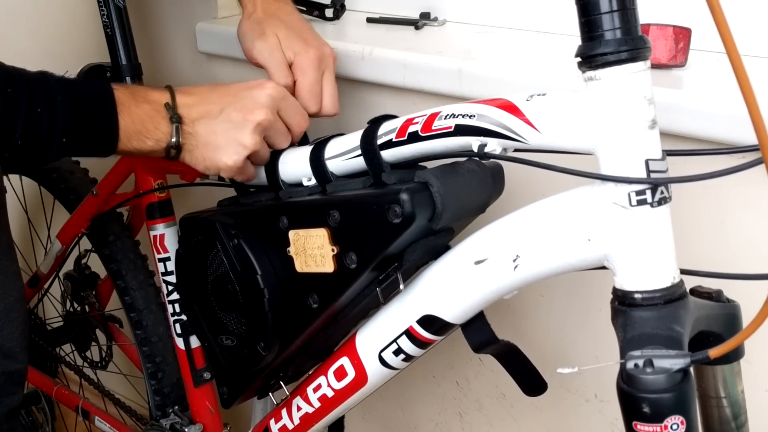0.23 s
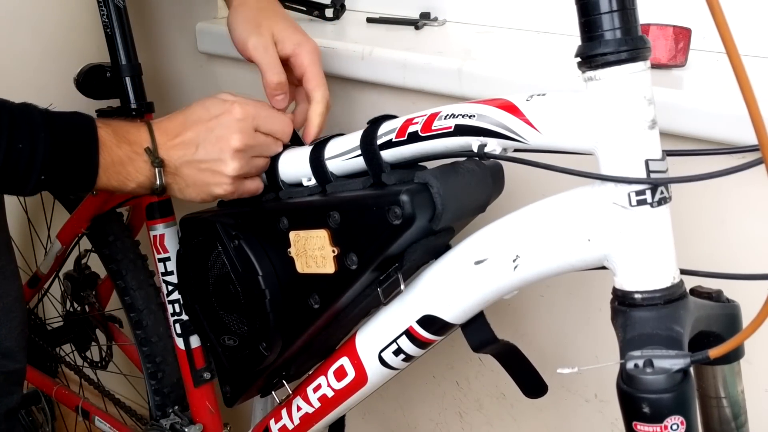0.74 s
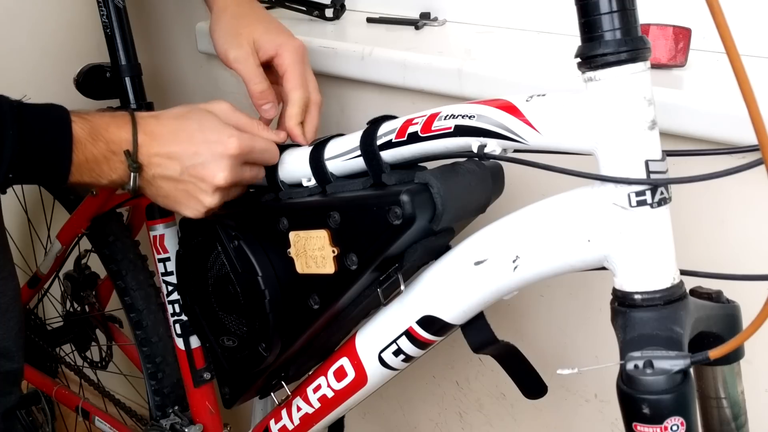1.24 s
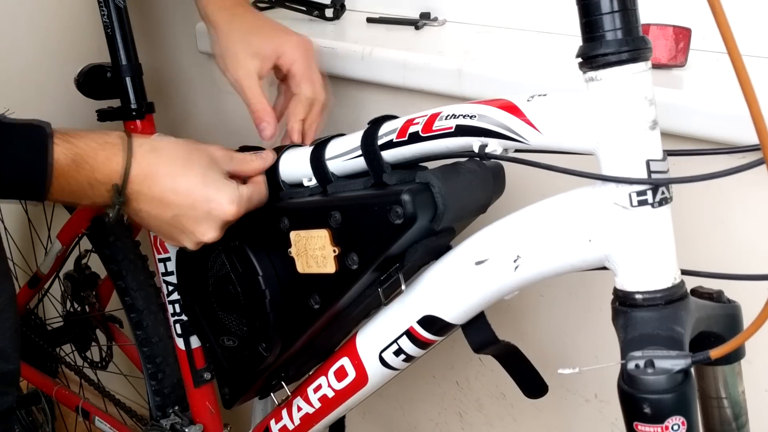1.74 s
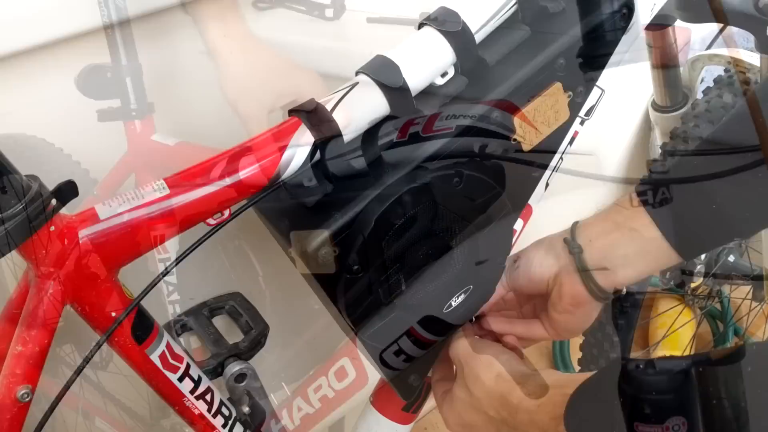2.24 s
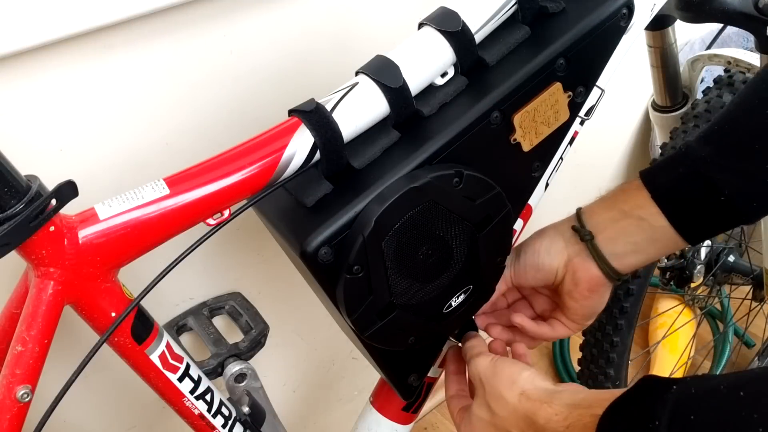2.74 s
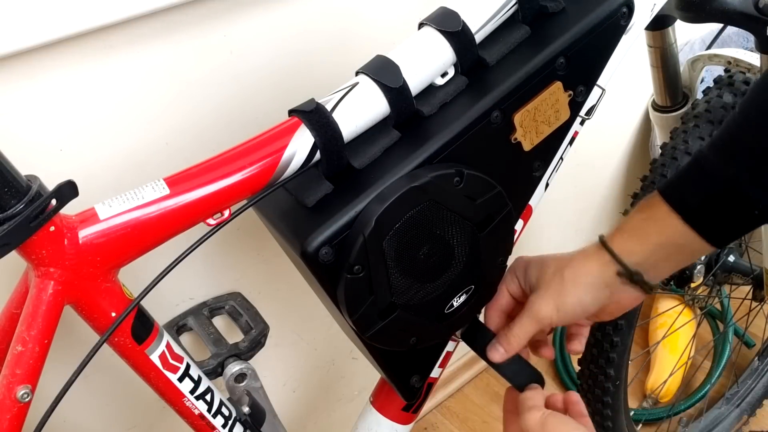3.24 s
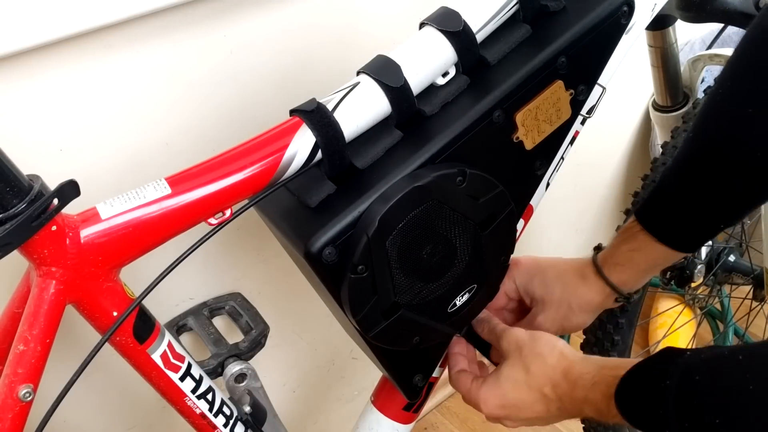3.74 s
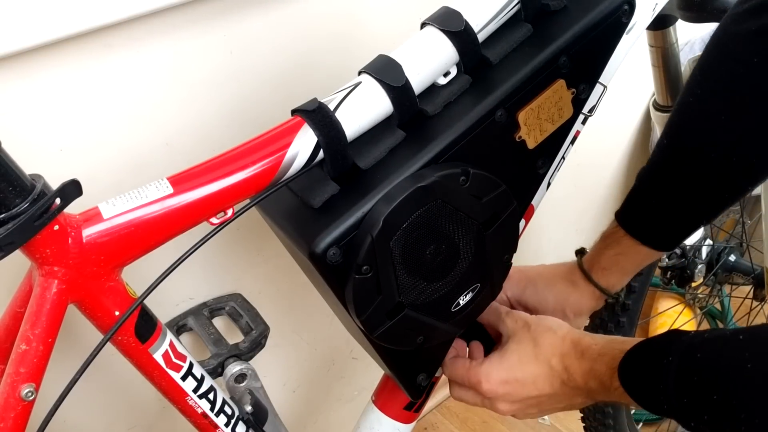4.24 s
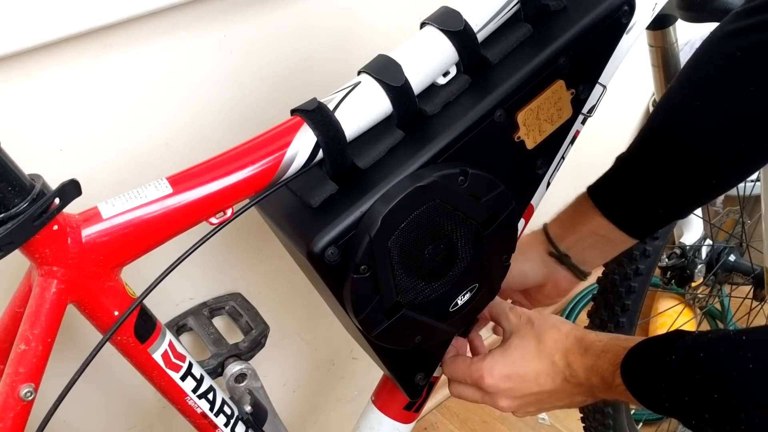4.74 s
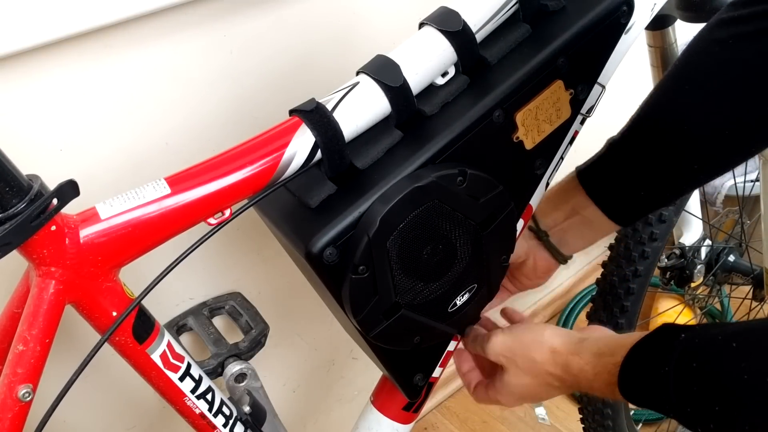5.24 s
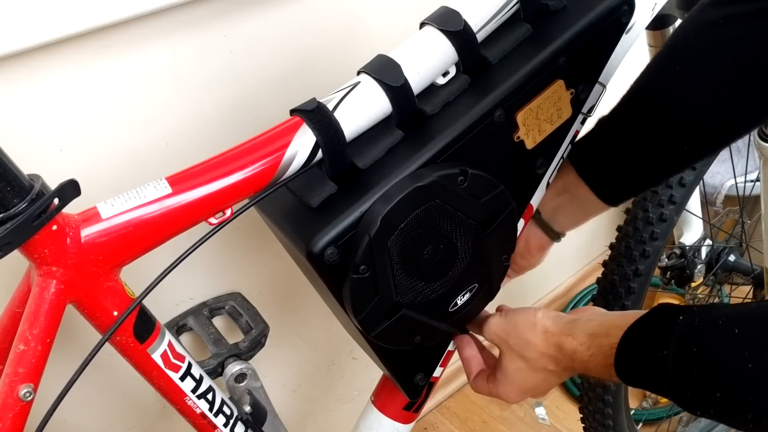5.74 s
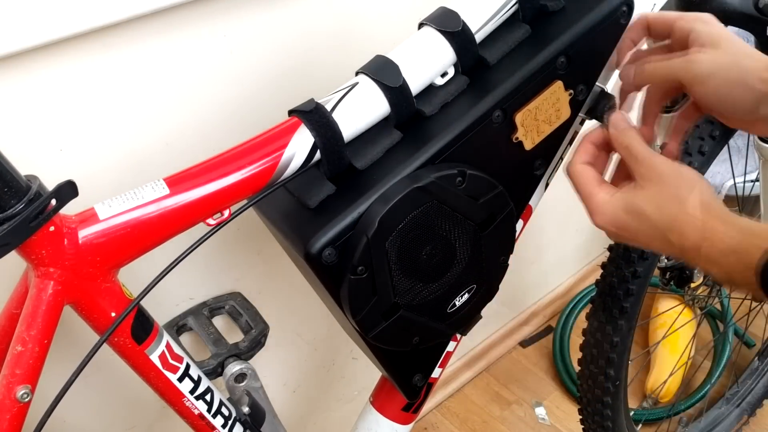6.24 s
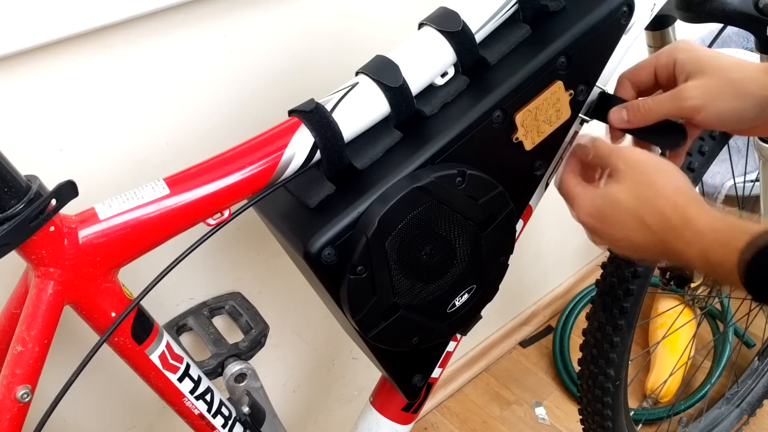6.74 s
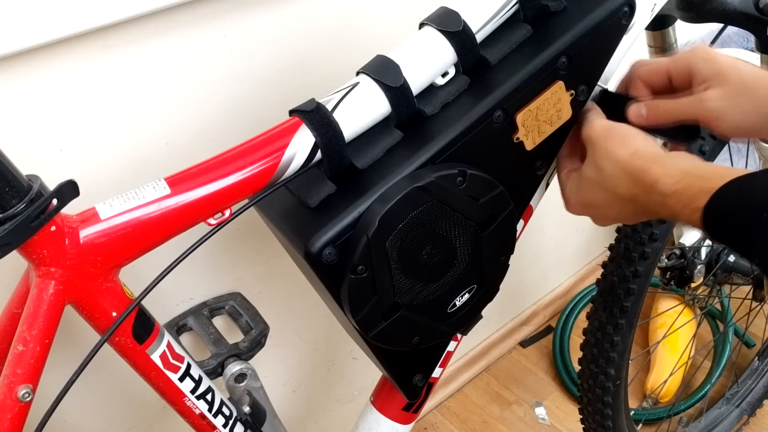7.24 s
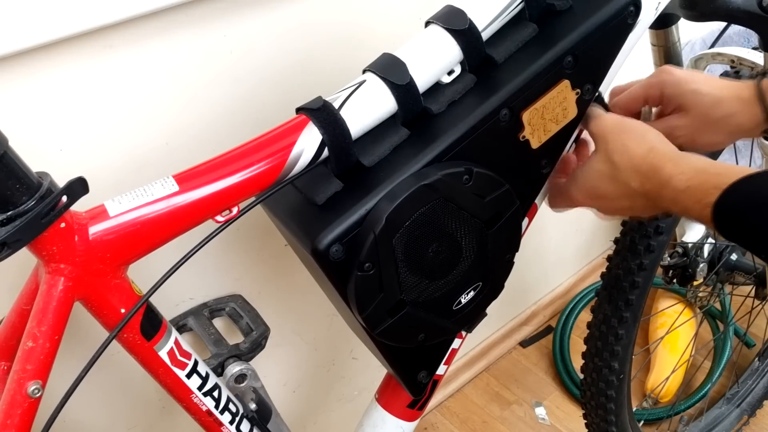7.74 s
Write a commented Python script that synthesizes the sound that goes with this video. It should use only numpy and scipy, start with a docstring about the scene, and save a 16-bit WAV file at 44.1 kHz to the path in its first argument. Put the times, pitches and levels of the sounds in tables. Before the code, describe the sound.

Hook-and-loop straps crackle, snap and rip in short bursts as hands fasten a plastic case to a bicycle frame indoors.

```python
"""Hook-and-loop straps are pulled open and pressed shut around a bicycle frame in a small room.
First the straps rub and crackle lightly, and tiny hooks let go in snaps and short rips. A taut strap
passes their jolts to the plastic case it holds, which rasps and rings. Near 3 s comes a longer peel,
and at 3.7 s the case knocks sharply on the frame. The loudest rips follow between 5 and 5.6 s;
then smaller rips, snaps and soft hand bumps thin out to a last quiet rub."""
import sys
import numpy as np
from scipy import signal
from scipy.fft import rfft, irfft
from scipy.io import wavfile

SR = 44100
rng = np.random.default_rng(int(sys.argv[2]) if len(sys.argv) > 2 else 0)


def persist_wave(psi):
    """Save psi, clipped to +-1, as 16-bit WAV."""
    counts = np.round(np.clip(psi, -1, 1) * 32767).astype(np.int16)
    wavfile.write(sys.argv[1], SR, np.atleast_2d(counts).T)


N = 352359
TOP_HZ = 16000   # upper limit for ringing pitches and for the final sound
PEEL_CLUMPS_PER_S, RIP_CLUMPS_PER_S = 230, 600

# Patches of hooks tearing loose: start_s, length_s, level_db, pitch_hz, tug_vs_hooks_db
RIPS = [(.494, 0.032, -54, 5840, -17), (0.7, 0.0042, -38, 6900, -33), (0.826, 0.013, -52.5, 5800, -30),
        (1.463, 0.037, -53, 9900, -17.5), (2.917, 0.034, -45.5, 8700, -30),
        (3.151, 0.0064, -45, 10100, -13), (3.186, 0.013, -45.5, 10300, -16.5),
        (3.226, 0.0045, -37, 10100, -19.5), (3.394, 0.013, -55.5, 7800, -10),
        (3.524, 0.0071, -51, 8100, 0.5), (3.6998, 0.0072, -38.5, 4070, -14),
        (4.081, 0.029, -56, 6940, -8.5), (4.856, 0.026, -50, 7150, -13), (4.952, 0.021, -51, 7150, -19.5),
        (5.126, 0.023, -41, 9500, -26), (5.3602, 0.0037, -27.5, 8600, -15.5),
        (5.384, 0.041, -41.5, 8570, -10.5), (5.438, 0.023, -39.5, 6260, -13.5),
        (5.5367, 0.02, -32, 7430, -19), (5.804, 0.0072, -47, 4500, -15.5), (6.125, 0.0083, -46, 6850, -12),
        (6.182, 0.013, -44, 5730, -15), (6.253, 0.019, -44, 5360, -14.5), (6.357, 0.021, -43.5, 7040, -20),
        (6.47, 0.014, -43.5, 9200, -13.5), (6.569, 0.0086, -35, 10000, -20),
        (6.746, 0.0072, -50, 4900, -10), (6.894, 0.018, -40.5, 9300, -21), (7.191, .0048, -43, 8200, -14.5),
        (7.5907, 0.0069, -49, 7360, -13)]


def rips(rows=RIPS):
    """Hooks tear loose in a rush. Gives two tracks: their own sound and their tug on the case."""
    hooks, tug = np.zeros(N), np.zeros(N)
    for start_s, length_s, level_db, pitch_hz, tug_vs_hooks_db in rows:
        clicks = avalanche(length_s, level_db)
        add(hooks, start_s, twang(clicks, pitch_hz))
        add(tug, start_s, through_strap(clicks) * from_db(tug_vs_hooks_db))
    return np.array([hooks, tug])


# A few hooks letting go at once: start_s, level_db, pitch_hz
SNAPS = [(.658, -47.5, 6900), (.7678, -40.5, 9560), (.785, -45, 11000), (0.822, -40.5, 10500),
         (.95, -38.5, 11600), (.985, -48, 11500), (1.7438, -51.5, 8450), (1.869, -53, 11000),
         (2.446, -57.5, 6570), (2.581, -51.5, 10300), (2.7566, -45, 9500), (2.9154, -38.5, 11200),
         (2.967, -47, 8400), (3.042, -40, 11500), (3.058, -37, 11400), (3.086, -44, 10860),
         (3.108, -40, 9940), (3.292, -37.5, 7620), (3.451, -49, 8950), (3.8854, -50, 9700),
         (3.9894, -48, 10500), (4.2241, -45.5, 9400), (4.245, -52, 4840), (4.265, -49, 9500),
         (4.287, -47.5, 9200), (4.721, -49, 11100), (4.745, -44, 12400), (5.0355, -49, 11000),
         (5.282, -34.5, 6760), (5.696, -41.5, 7700), (5.762, -40.5, 6000), (5.8847, -48, 5300),
         (6.0274, -41, 6650), (6.154, -41, 10540), (6.3551, -41, 8800), (6.475, -34.5, 9100),
         (6.71, -37, 8450), (6.901, -38, 6500), (7.0317, -42.5, 11000), (7.1745, -44.5, 8500),
         (7.226, -42, 7500), (7.324, -42.5, 11000)]


def snaps(length_s=.0022, tug_vs_hooks_db=-24.5):
    """A snap is a very short rip. Plays the listed snaps and some stray ones."""
    return rips([(start_s, length_s, level_db, pitch_hz, tug_vs_hooks_db)
                 for start_s, level_db, pitch_hz in SNAPS + stray_snaps()])


# Hand movements that peel, thread or smooth a strap:
# start_s, length_s, level_db, pitch_hz, tug_db, crackle (0 = sliding, 1 = peeling)
STROKES = [(.07, 0.052, -65.5, 7800, -83, 0.17), (0.413, 0.12, -69.5, 8000, -85, 0.35),
           (0.648, 0.38, -59, 8000, -78, 0.47), (1.023, 0.093, -53, 7800, -71.5, .3),
           (1.229, 0.31, -72.5, 9500, -105, 1), (1.522, 0.16, -79, 9700, -81.5, .1),
           (1.826, 0.14, -69.5, 7700, -80, .2), (2.052, 0.092, -61.5, 8260, -72, 0.085),
           (2.192, 0.048, -64.5, 5350, -73, 0.6), (2.369, 0.044, -69.5, 8000, -77.5, .2),
           (2.555, 0.096, -69.5, 6400, -83, 0.74), (2.728, 0.085, -66, 8500, -79.5, 0.34),
           (2.92, .21, -54, 9400, -67, 0.78), (3.126, .165, -52, 7700, -65, 0.74),
           (3.324, 0.62, -72, 7860, -82, 0.9), (3.98, 0.35, -75, 6570, -81.5, .4),
           (4.358, 0.19, -62.5, 7600, -77, 0.11), (4.597, 0.058, -56.5, 9300, -72, 0.21),
           (4.728, 0.094, -70.5, 5900, -79.5, .2), (4.87, 0.49, -62, 7230, -80, 0.31),
           (5.134, 0.032, -46.5, 6340, -59.5, .3), (5.229, .11, -60, 6700, -77, 0.56),
           (5.36, 0.14, -45, 6100, -77, 0.47), (5.541, 0.089, -48.5, 5370, -70, 0.29),
           (5.659, 0.12, -57, 6270, -72, .3), (5.8, 0.36, -67, 6860, -76, .3),
           (5.938, 0.049, -57.5, 7200, -77, 0.16), (6.121, .22, -63.5, 5800, -69.5, 0.35),
           (6.38, 0.055, -50.5, 7860, -65.5, 0.24), (6.472, .23, -65, 6200, -67.5, 0.11),
           (6.979, 0.11, -56.5, 9200, -74.5, 0.96), (7.167, 0.08, -56, 8400, -66.5, 0.62),
           (7.289, 0.12, -57, 7140, -68, 0.57), (7.438, 0.28, -66, 7900, -72, 0.2),
           (7.719, 0.24, -74, 7260, -75, 0.16)]


def strokes(fade_in_s=.028, fade_out_s=.04, surge_db=5):
    """A strap rubs as it slides and crackles as it peels. Gives the hook sound and the tug."""
    hooks, tug = np.zeros(N), np.zeros(N)
    t = np.arange(SR) / SR
    for start_s, length_s, level_db, pitch_hz, tug_db, crackle in STROKES:
        pull = np.clip(t / fade_in_s, 0, 1) * np.clip(1 - (t - length_s) / fade_out_s, 0, 1)
        pull *= from_db(surge_db * crackle * surges(t))
        grains = pull * rng.standard_normal(len(t))
        grains *= clumps(len(t), PEEL_CLUMPS_PER_S, steady_share=1 - crackle)
        add(hooks, start_s, twang(grains, pitch_hz) * from_db(level_db))
        add(tug, start_s, through_strap(grains) * from_db(tug_db))
    return np.array([hooks, tug])


def stray_snaps(peeling_per_s=20, boost_db=5, spread_db=4, tries=24):
    """The more a stroke peels, the more often a stubborn hook snaps. Gives rows like SNAPS."""
    rows = []
    for start_s, length_s, level_db, pitch_hz, _, crackle in STROKES:
        chance = peeling_per_s * crackle * length_s / tries
        for luck, when, force in zip(rng.random(tries), rng.random(tries), rng.standard_normal(tries)):
            if luck < chance:
                snap_db = level_db + boost_db + spread_db * force
                rows.append((start_s + when * length_s, snap_db, 2 * pitch_hz))   # a lone hook is brighter
    return rows


def avalanche(length_s, level_db, hooks_per_s=14000):
    """Hooks let go at random moments, in a run of clicks that swells and dies out."""
    size = int(length_s * SR * 3) + 2   # leaves time for the tail
    progress = np.arange(size) / (length_s * SR)
    swell = progress ** .47 * np.exp(-progress ** 2)
    swell *= clumps(size, RIP_CLUMPS_PER_S, steady_share=.55)
    force = uneven_force(size, spread_db=2)
    lets_go = rng.random(size) < hooks_per_s / SR
    clicks = lets_go * force * rng.choice([-1, 1], size) * swell
    return clicks * np.sqrt(length_s * SR / (np.sum(clicks ** 2) + 1e-12)) * from_db(level_db)


def clumps(size, per_s, steady_share, fade_s=.0007):
    """One freed hook tears its neighbours loose: the loudness jumps at random and drops right back."""
    chance = per_s / SR
    force = uneven_force(size, spread_db=5.5)
    jumps = (rng.random(size) < chance) * force ** 2 / chance
    keep = np.exp(-1 / (fade_s * SR))
    power = signal.lfilter([1 - keep], [1, -keep], jumps + 1e-18)
    return np.sqrt(steady_share + (1 - steady_share) * power)


def uneven_force(size, spread_db):
    """Some hooks hold harder than others: random strengths with an average power of 1."""
    return rms_one(from_db(spread_db * np.clip(rng.standard_normal(size), -2, 2)))


def surges(t, per_s=36, count=200):
    """A peeling strap catches and gives way: an uneven swing between -1 and 1."""
    turns_s = np.cumsum(rng.uniform(.5, 1.5, count)) / (2 * per_s)
    swings = rng.random(count) ** .5 * (-1.) ** np.arange(count)
    return np.interp(t, turns_s, swings)


def twang(clicks, pitch_hz, ring_db=-21):
    """Freed hooks flick back with a tick and three brief rings; they are too small to make low notes."""
    tick = resonate(np.pad(clicks, (0, 256)), pitch_hz, sharpness=.69)
    tick = signal.lfilter(*signal.butter(2, .33 * pitch_hz, "high", fs=SR), tick)
    pitches = pitch_hz * np.exp(.363 * rng.standard_normal(3))
    rings = sum((-1) ** k * resonate(tick, hz, sharpness=9) for k, hz in enumerate(pitches))
    return tick + from_db(ring_db) * rings


# Thin, gliding hisses of a taut strap, and one snap's brief bright ring:
# start_s, end_s, level_db, start_hz, end_hz
ZIPS = [(0.478, 0.534, -57.5, 5570, 6470), (0.641, 1.034, -60, 7700, 7900),
        (2.984, 3.125, -57, 12800, 9970), (3.149, 3.227, -48.5, 9100, 9120),
        (3.156, 3.265, -52.5, 5900, 6100), (3.886, 3.889, -44.5, 8000, 7800),
        (6.127, 6.19, -56, 5100, 4400), (6.379, 6.588, -56.5, 7800, 7000), (6.909, 7.08, -66, 5450, 5800)]


def zips(block=128):
    """The weave strums a strap whose pitch follows its free length; the shortest row is a snap's ring."""
    out = np.zeros(N)
    for start_s, end_s, level_db, start_hz, end_hz in ZIPS:
        size = max(int((end_s - start_s) * SR), block)
        progress = np.linspace(0, 1, size)
        swell = rms_one(np.sqrt(progress * (1 - progress))) * from_db(level_db)
        grains = swell * rng.standard_normal(size) * clumps(size, PEEL_CLUMPS_PER_S, steady_share=.25)
        for i in range(0, size, block):
            pitch_hz = start_hz + (end_hz - start_hz) * progress[i]
            piece = np.pad(grains[i:i + block], (0, block))
            add(out, start_s + i / SR, resonate(piece, pitch_hz, sharpness=7))
    return out


def through_strap(clicks):
    """Each jolt travels along the strap and arrives just as strong, as a push or a pull at random."""
    return clicks * rng.choice([-1, 1], len(clicks))


# Notes at which the plastic case rings: pitch_hz, relative_db
CASE_NOTES = [(331, 8), (419, -10), (479, -5), (588, -7.5), (739, -8), (875, -35), (902, -7), (1066, -11),
              (1250, -5.5), (1367, 9)]


def case(tug, blows, panel_hz=2075, ring_s=.068):
    """Tugs give the case a woody rasp with one bright panel note; tugs and knocks both make it ring."""
    rasp = band(tug, 433, 2190, order=1)
    rasp = signal.lfilter(*signal.butter(2, 257, "high", fs=SR), rasp)
    rasp += from_db(-19) * resonate(rasp, panel_hz, sharpness=9.1)
    force = from_db(-63) * rasp + from_db(-50) * blows
    notes = np.zeros(N)
    for pitch_hz, relative_db in CASE_NOTES:
        # the sound follows how fast the wall moves, not how far
        wall_speed = np.gradient(ring(force, pitch_hz, ring_s)) * SR / (2 * np.pi * pitch_hz)
        notes += from_db(relative_db) * wall_speed
    bass_cut = signal.butter(4, 285, "high", fs=SR, output="sos")   # a small case gives almost no bass
    return signal.sosfilt(bass_cut, rasp + blows + notes)


# The case and fingers hitting the frame, plus one small rip at 2.41 s played the same way: start_s, contact_s,
# level_db, pitch_hz
KNOCKS = [(.701, 0.0064, -58, 1330), (1.471, 0.037, -70.5, 503), (2.073, 0.022, -73, 1060),
          (2.411, 0.0047, -63, 2050), (3.526, 0.0035, -52.5, 1280), (3.6998, 0.0015, -34, 593),
          (3.706, 0.012, -44, 760), (3.711, 0.02, -56, 516), (4.104, 0.0085, -62, 613),
          (4.863, 0.02, -58.5, 970), (5.361, 0.0035, -48.5, 836), (5.392, 0.026, -61, 693),
          (5.452, 0.016, -53.5, 734), (6.475, 0.0071, -57.5, 387), (6.899, 0.0033, -45.5, 3140),
          (7.384, 0.0085, -61.5, 450)]


def knocks():
    """Each knock is a short, rough contact with its own pitch and loudness."""
    out = np.zeros(N)
    t = np.arange(SR // 10) / SR
    for start_s, contact_s, level_db, pitch_hz in KNOCKS:
        contact = rng.choice([-1., 1.], len(t)) * np.exp(-t / contact_s)
        force = resonate(contact, pitch_hz, sharpness=3.3)
        add(out, start_s, force * np.sqrt(contact_s * SR / np.sum(force ** 2)) * from_db(level_db))
    return out


# Hands bumping the bicycle: start_s, level_db, pitch_hz, ring_s
BUMPS = [(2.194, -64, 101, .3), (2.309, -52, 137, 0.038), (2.311, -59, 285, 0.11), (3.118, -58, 183, 0.18),
         (6.128, -66, 220, 0.14), (6.306, -57.5, 77.7, 0.82), (6.33, -56.5, 135, 0.13),
         (7.191, -69, 210, 0.19)]


def bumps():
    """Each bump is a soft thud: one low note that fades away."""
    out = np.zeros(N)
    for start_s, level_db, pitch_hz, ring_s in BUMPS:
        add(out, start_s, from_db(level_db) * ring(signal.unit_impulse(SR // 2), pitch_hz, ring_s))
    return out


# The room's echo, low to high: pitch_hz, ring_s (time to fade by 60 dB), echo_vs_direct_db
ECHOES = [(193, 0.16, 5), (760, 0.39, -4.5), (2400, 0.36, 0), (6240, 0.4, -5), (9700, 0.29, -2),
          (14900, 0.2, -0.5)]


def echoes(gap_s=.00082, build_s=.0019):
    """Near walls answer a click with a dense wash of echoes; each pitch range fades at its own speed."""
    t = np.arange(int(SR * .55)) / SR
    onset = np.clip((t - gap_s) / build_s, 0, 1)
    edges_hz = np.geomspace(100, 18000, 11)
    out = np.zeros(len(t))
    for low, high in zip(edges_hz, edges_hz[1:]):
        middle_hz = np.sqrt(low * high)
        fade = np.exp(-np.log(1000) * t / at_hz(ECHOES, middle_hz))
        tail = rms_one(band(rng.standard_normal(len(t)), low, high, order=4) * fade * onset)
        band_share = (high - low) / (SR / 2)
        out += tail * from_db(at_hz(ECHOES, middle_hz, column=2)) * np.sqrt(band_share / len(t))
    return out


def room(sound, stretches=14):
    """As hands and straps move, the pattern of echoes changes from one stretch of time to the next."""
    out, size = np.zeros(N), N // stretches + 1
    for i in range(0, N, size):
        add(out, i / SR, signal.fftconvolve(sound[i:i + size], echoes()))
    return out


# The tone of the still room's noise: pitch_hz, relative_db
AIR = [(25, -25), (36, -11), (48, 5), (80, -6), (120, -5), (200, -2), (250, -10.5), (320, -5.5), (420, -11),
       (900, -18), (2000, -18.5), (5000, -20.5), (12000, -14), (16000, -12.5)]
# Faint humming notes: pitch_hz, level_db
HUM = [(50, -95), (75.4, -84.5), (100, -82.5), (148, -85.5), (299, -84)]


def still_air(hiss_db=-66):
    """The quiet room has a steady hiss and rumble with a faint hum."""
    t = np.arange(N) / SR
    pitches = np.maximum(np.fft.rfftfreq(N, 1 / SR), 1)
    hiss = rms_one(irfft(rfft(rng.standard_normal(N)) * from_db(at_hz(AIR, pitches)), N))
    hum = sum(from_db(db) * np.sqrt(2) * np.sin(2 * np.pi * (hz * t + rng.random())) for hz, db in HUM)
    return from_db(hiss_db) * hiss + hum


def from_db(db):
    """Turn decibels into a number to multiply by."""
    return 10 ** (np.asarray(db) / 20)


def rms_one(x):
    """Scale a sound to an average power of 1."""
    return x / np.sqrt(np.mean(x ** 2) + 1e-20)


def at_hz(table, hz, column=1):
    """Read a table at any pitch, blending between its rows."""
    table = np.array(table)
    return np.interp(np.log(hz), np.log(table[:, 0]), table[:, column])


def band(x, low_hz, high_hz, order):
    """Keep one range of pitches; white noise keeps its power."""
    sos = signal.butter(order, [low_hz, high_hz], "band", fs=SR, output="sos")
    return signal.sosfilt(sos, x + 1e-18) * np.sqrt(SR / 2 / (high_hz - low_hz))


def resonate(x, hz, sharpness):
    """Bring out one pitch; more sharpness (Q) rings longer. White noise keeps its power."""
    angle = 2 * np.pi * min(hz, TOP_HZ) / SR
    damping = np.sin(angle) / (2 * sharpness)
    feed = np.sqrt(damping * (1 + damping)) * np.array([1, 0, -1])
    return signal.lfilter(feed, [1 + damping, -2 * np.cos(angle), 1 - damping], x + 1e-18)


def ring(clicks, hz, ring_s):
    """Each click starts a pure note that fades by 60 dB in ring_s."""
    keep = np.exp(-np.log(1000) / (ring_s * SR))
    angle = 2 * np.pi * hz / SR
    return signal.lfilter([0, np.sin(angle)], [1, -2 * keep * np.cos(angle), keep ** 2], clicks + 1e-18)


def add(track, start_s, sound):
    """Mix a sound into a track at a given time."""
    start = max(round(start_s * SR), 0)
    track[start:start + len(sound)] += sound[:max(N - start, 0)]


def scene():
    """Straps and case echo in the room, over hand bumps and still air."""
    background = still_air()
    hooks, tug = strokes() + rips() + snaps()
    direct = hooks + zips() + case(tug, knocks())
    return (direct + room(direct) + bumps() + background)[None]


def record(dry, dull_above_hz=17200):
    """The microphone dulls the highest treble; the very top is cut steeply."""
    dulled = signal.lfilter(*signal.butter(1, dull_above_hz, fs=SR), dry)
    return signal.sosfilt(signal.ellip(12, .1, 80, TOP_HZ, fs=SR, output="sos"), dulled)


dry = scene()
out = record(dry)
persist_wave(out)
```